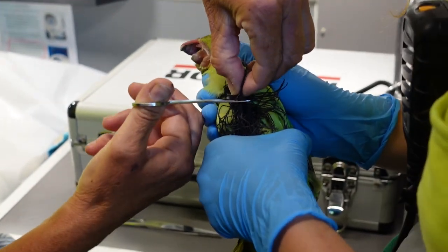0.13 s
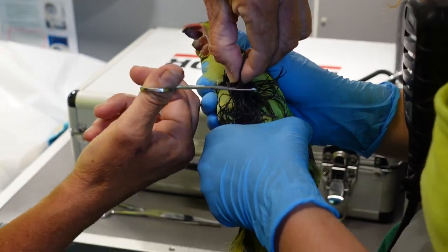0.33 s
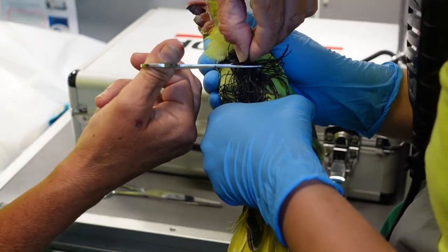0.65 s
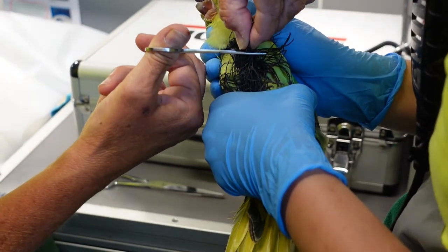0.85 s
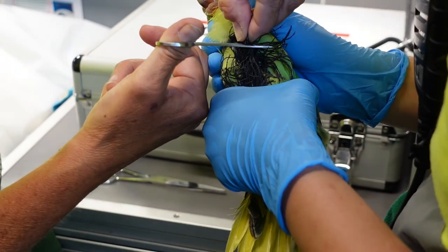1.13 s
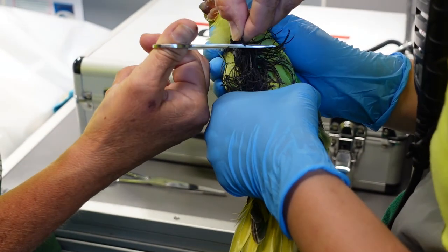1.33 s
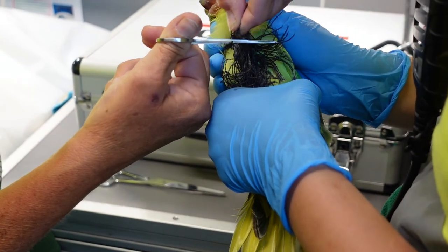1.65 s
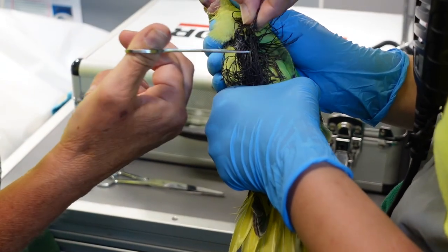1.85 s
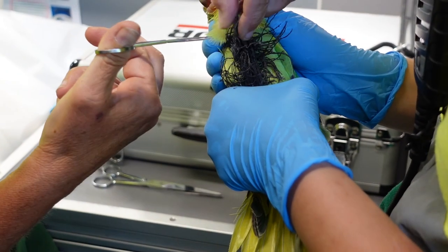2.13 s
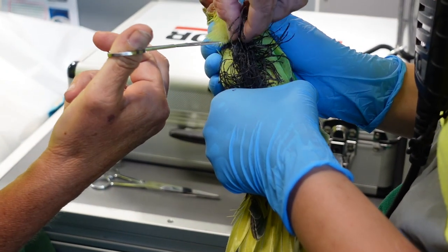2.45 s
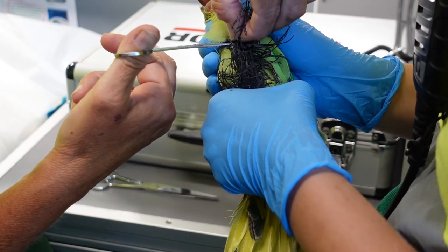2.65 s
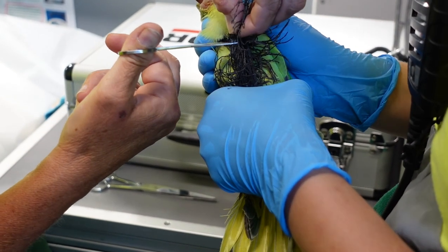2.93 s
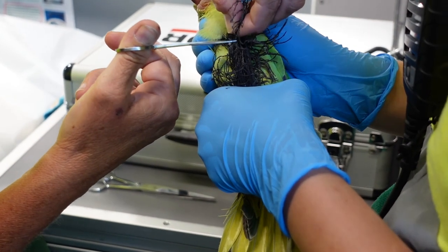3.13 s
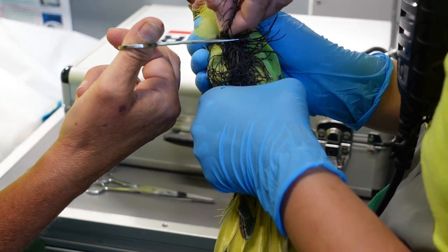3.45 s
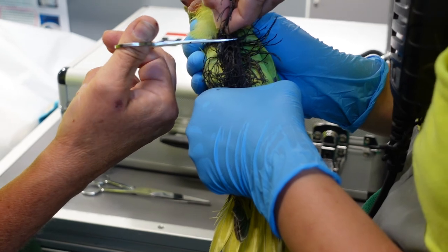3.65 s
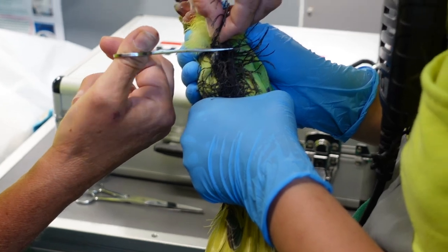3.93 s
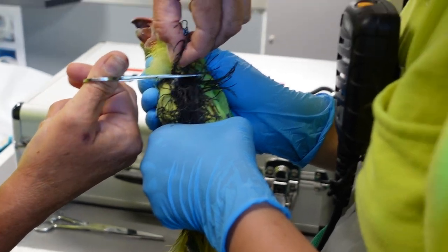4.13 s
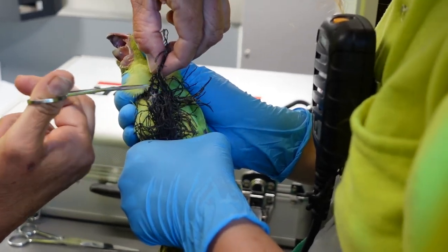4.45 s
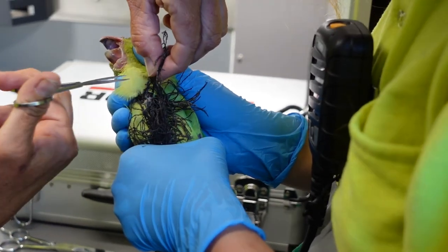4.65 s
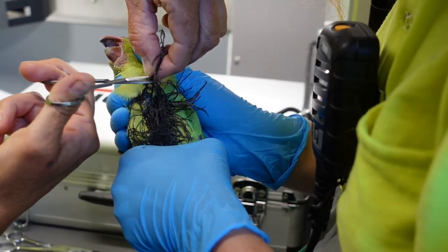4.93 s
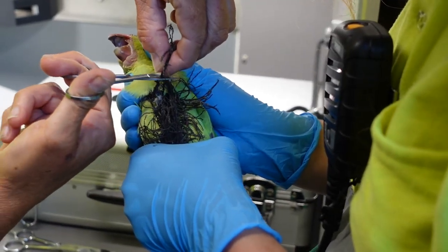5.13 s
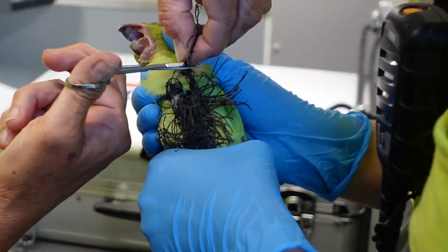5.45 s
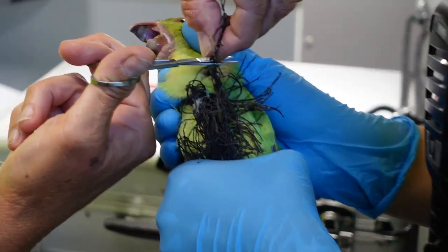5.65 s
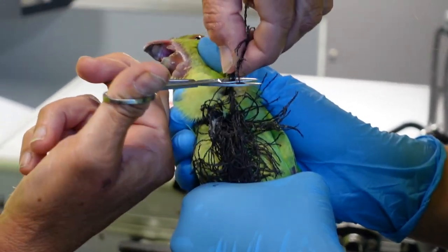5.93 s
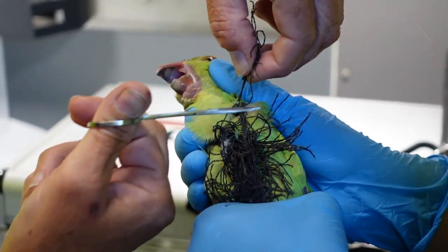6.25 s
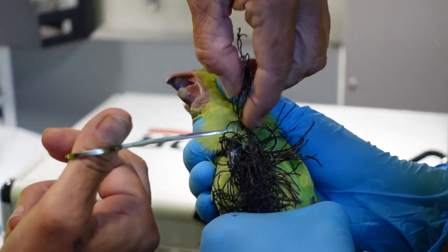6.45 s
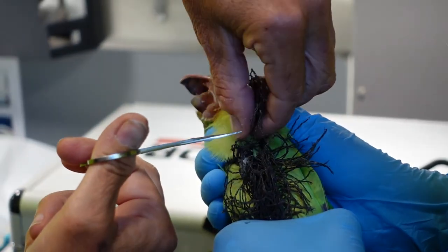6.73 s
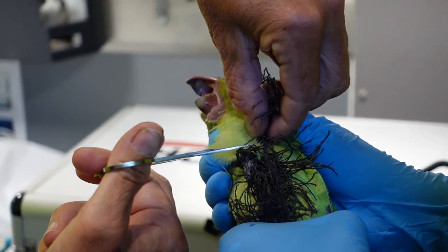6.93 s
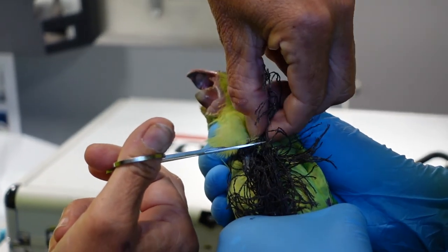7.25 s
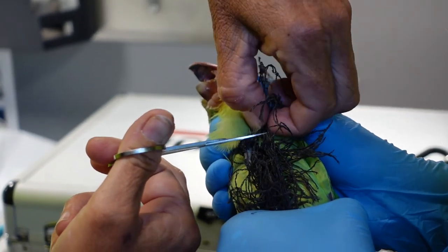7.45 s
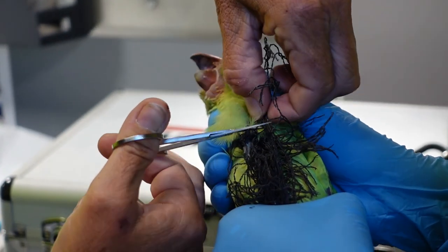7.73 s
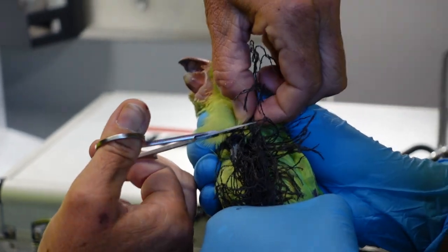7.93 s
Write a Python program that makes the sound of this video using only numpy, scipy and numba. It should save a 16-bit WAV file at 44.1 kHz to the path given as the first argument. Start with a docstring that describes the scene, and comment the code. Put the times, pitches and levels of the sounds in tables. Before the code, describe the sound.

A parakeet screeches over and over in harsh, evenly spaced rasps while scissors snip faintly inside a parked van.

```python
"""Parakeet screeching in a parked van

A hand-held parakeet screeches again and again while scissors snip netting off it. Each screech is a
rattle of about 83 bursts a second; each burst is a few sharp snaps of the syrinx that ring throat and
beak. Once, between screeches, the bird whines thinly. The small cabin rings briefly over a faint rumble."""
import sys
import numpy as np
from scipy import signal
from scipy.fft import rfft, irfft, next_fast_len
from scipy.io import wavfile
from numba import njit

SR = 44100
rng = np.random.default_rng(int(sys.argv[2]) if len(sys.argv) > 2 else 0)


def unload_audio(sound):
    """Save the sound as a 16-bit wav file, at the path given as the first command line argument."""
    columns = np.transpose(np.atleast_2d(sound))
    # keep every value between -1 and 1, then stretch to whole-number steps
    steps = np.round(np.clip(columns, -1, 1) * 32767)
    wavfile.write(sys.argv[1], SR, steps.astype(np.int16))


N = 356769
T = np.arange(N) / SR


def undb(db):
    """Decibels to gain."""
    return 10 ** (np.asarray(db) / 20)


def unit(x):
    """Scale to rms 1."""
    return x / np.sqrt(np.mean(x ** 2) + 1e-18)


def curves(rows):
    """A table's columns, interpolated over the time in its first column."""
    times, *columns = np.transpose(rows)
    return [np.interp(T, times, column) for column in columns]


def add(track, sound, start_s):
    """Mix a sound in; it may start before time zero."""
    i = int(start_s * SR)
    sound, i = sound[max(-i, 0):], max(i, 0)
    track[i:i + len(sound)] += sound[:N - i]


def cut(x, hz, kind, order=2):
    """Butterworth low-pass or high-pass."""
    return signal.sosfilt(signal.butter(order, hz, kind, fs=SR, output="sos"), x)


def band(x, low_hz, high_hz):
    """Gentle band-pass."""
    return cut(cut(x, low_hz, "high"), high_hz, "low")


@njit
def resonator(x, hz, width_hz):
    """State-variable band-pass, gain 1 at its moving centre."""
    y, band_state, low_state = np.empty(len(x)), 0., 0.
    for i in range(len(x)):
        g, damping = np.tan(np.pi * hz[i] / SR), width_hz / hz[i]
        v = (band_state + g * (x[i] - low_state)) / (1 + g * (g + damping))
        band_state = 2 * v - band_state
        low_state += 2 * g * v
        y[i] = damping * v
    return y


def resonate(x, modes, tuning=1):
    """Parallel (Hz, width Hz, dB) resonances, their centres scaled by tuning."""
    tuning = tuning * np.ones(len(x))
    return sum(undb(db) * resonator(x, hz * tuning, float(width)) for hz, width, db in modes)


def shaped_noise(samples, spectrum):
    """Noise of rms 1, minimum-phase filtered through (Hz, dB) points."""
    size = next_fast_len(samples + 4096)
    hz, db = np.transpose(spectrum)
    bin_hz = np.arange(size + 1) * SR / (2 * size)
    gain = undb(np.interp(np.log(bin_hz + 1), np.log(hz), db))
    cepstrum = irfft(np.log(gain))
    cepstrum[1:size] *= 2
    cepstrum[size + 1:] = 0
    white = rfft(rng.standard_normal(samples), 2 * size)
    return unit(irfft(white * np.exp(rfft(cepstrum)))[:samples])


def drift(below_hz):
    """Slow random motion of rms 1."""
    return unit(cut(rng.standard_normal(N), below_hz, "low"))


# Cabin hush. Each row: frequency in Hz, relative density in dB.
HUSH_SPECTRUM = [(25, -34.5), (65, -15), (120, -20), (190, -13), (280, -9.5), (420, -4), (560, -7.5),
                 (1000, -4), (1600, -11), (3300, -15), (6500, -26), (15000, -33)]
# Each row: time in seconds, rumble level in dB, hush level in dB.
BACKGROUND_LEVELS = [(0, -82.5, -66), (2.55, -87, -64), (3.4, -80.5, -62.5), (4.1, -75, -62),
                     (5.8, -83, -63), (7.35, -77.5, -65), (8.05, -66.5, -64.5)]

def background(side_db=-13, waver_db=2):
    """A faint stereo hush and an uneven low rumble in the van."""
    rumble_db, hush_db = curves(BACKGROUND_LEVELS)
    mid, side = (shaped_noise(N, HUSH_SPECTRUM) for _ in range(2))
    hush = mid + undb(side_db) * np.array([side, -side])
    rumble = resonate(rng.standard_normal(N), [(120, 35, 0), (300, 130, -9)])
    rumble = unit(cut(rumble, 400, "low"))
    return undb(hush_db) * hush + undb(rumble_db + waver_db * drift(6)) * rumble


# Each row: frequency in Hz, relative gain in dB.
CABIN_MODES = [(420, -1), (500, 6), (775, -0.5), (904, -0.5), (1141, 4), (1346, 5), (1529, -9.5),
               (1735, -2), (1852, -3.5), (1906, -2.5), (2046, -0.5), (2110, -7.5), (2217, 2), (2326, -5),
               (2408, 0), (2556, 4.5), (2722, -10), (3050, -4.5), (3241, -9.5), (3477, -8), (3992, -1.5),
               (4154, 0.5), (4290, -3.5), (4466, 3.5), (5050, -1.5), (5115, -5), (5733, -2.5), (6005, 5)]
# Each row: delay in seconds, level in dB re the direct sound, left minus right in dB.
WALL_ECHOES = [(.0062, -16, -2), (.0049, -19, 2)]

def cabin(x, direct_db=-7, ring_db=-3, ring_width_hz=30, tail_db=-12, side_db=-15,
          t60_s=.16, treble_t60_s=.13):
    """Direct sound, near echoes, cabin resonances and a short diffuse tail, wider in the treble."""
    t = np.arange(14000) / SR
    impulse = (t == 0) * 1.
    ring = resonate(impulse, [(hz, ring_width_hz, db) for hz, db in CABIN_MODES])
    response = np.tile(undb(direct_db) * impulse + undb(ring_db) * ring, (2, 1))
    for delay_s, db, pan_db in WALL_ECHOES:
        response[:, int(delay_s * SR)] += undb(db + direct_db + np.array([pan_db, -pan_db]) / 2)
    noise = rng.standard_normal((2, len(t)))
    lows = cut(noise, 4700, "low", order=1)
    decay = undb(-60 * t / t60_s)
    tail = lows * decay + 1.375 * (noise - lows) * undb(-60 * t / treble_t60_s)
    mid, side = tail * (t > .003) / np.linalg.norm(decay)
    side = cut(cut(side, 500, "high", order=1), 10000, "low")
    response += undb(tail_db) * mid + undb(side_db) * np.array([side, -side])
    return signal.fftconvolve(x[None], response, axes=1)[:, :N]


# Each row: frequency in Hz, relative density in dB.
CLICK_SPECTRUM = [(300, -24), (1500, -30.5), (3000, -6), (5500, -8), (9000, -1.5), (12000, -17.5),
                  (15000, -10.5)]
KNOCK_SPECTRUM = [(150, -16), (450, 24.5), (900, 10), (2500, 15.5), (5500, 3.5), (9000, -4), (16000, -37)]
# Each row: start in seconds, click level in dB, knock in dB re the click, click T60 in seconds.
SCISSOR_SNIPS = [(1.758, -33.5, -15, .0074), (4.118, -37.5, 10, 0.0043), (4.154, -48, -12, .01),
                 (4.217, -49.5, -11, .03), (4.224, -22.5, -12, .008)]

def scissors(knock_t60_s=.0063):
    """Blades click shut through the threads, sometimes with a dull knock."""
    track, t = np.zeros(N), np.arange(4096) / SR
    for start_s, level_db, knock_db, t60_s in SCISSOR_SNIPS:
        click = shaped_noise(len(t), CLICK_SPECTRUM) * undb(-60 * t / t60_s)
        knock = shaped_noise(len(t), KNOCK_SPECTRUM) * undb(-60 * t / knock_t60_s)
        add(track, undb(level_db) * (click + undb(knock_db) * knock), start_s)
    return track


# Each row: time in seconds, pitch in Hz, tone level in dB, hiss level in dB.
WHINE_CONTOUR = [(5.62, 478, -39, -49), (5.66, 480, -46, -48), (5.73, 481, -45.5, -47),
                 (5.77, 487, -44.5, -50), (5.787, 463, -47, -42.5), (5.8, 450, -62, -64)]
# Each row: harmonic number, relative level in dB.
WHINE_HARMONICS = [(1, -21), (3, -3), (4, 0.5), (5, -1), (7, -0.5), (9, -5), (10, -14), (11, -6.5),
                   (13, -19)]
# Each row: frequency in Hz, width in Hz, relative gain in dB.
WHINE_HISS_MODES = [(400, 210, 1), (2000, 980, -8.5), (3760, 1600, -5)]

def whine(waver=.0056):
    """The bird holds a thin, hissy note that ends in a short rasp."""
    pitch_hz, tone_db, hiss_db = curves(WHINE_CONTOUR)
    phase = 2 * np.pi * np.cumsum(pitch_hz * (1 + waver * drift(52))) / SR
    tone = unit(sum(undb(db) * np.sin(k * phase) for k, db in WHINE_HARMONICS))
    hiss = unit(cut(resonate(rng.standard_normal(N), WHINE_HISS_MODES), 9000, "low"))
    sounding = (T > WHINE_CONTOUR[0][0]) & (T < WHINE_CONTOUR[-1][0])
    return (undb(tone_db) * tone + undb(hiss_db) * hiss) * sounding


def chirps(t, starts_s, detune, top_hz=5600, spread=.1425, fall_s=.002577, length_s=.0045):
    """The membrane slackens through each burst, so its note drops over two octaves in a few ms."""
    burst = np.maximum(np.searchsorted(starts_s, t) - 1, 0)
    age_s = np.clip(t - starts_s[burst], 0, length_s)
    onset_hz = top_hz * np.exp(spread * detune[burst])
    cycles = onset_hz * fall_s * (1 - np.exp(-age_s / fall_s))
    return np.sin(2 * np.pi * cycles) * np.sin(np.pi * age_s / length_s)


# Successive snaps of one burst. Each entry: relative level in dB.
SNAP_LEVELS_DB = [-3, -3.5, -1.5, -4, -4.5, -6.5, -7, -11]

def syrinx(t, length_s, rattle_hz, snap_hz, burst_jitter=.018, gap_jitter=.08,
           puff_s=.0005, puff_db=-6, chirp_db=-13, bursts=56):
    """Bursts of uneven snaps with puffs of air and a chirp. Also returns one plain beat per burst."""
    shift, spacing, accent, detune = rng.standard_normal((bursts, 4)).T
    snap_spacing, snap_accent = rng.standard_normal((bursts, len(SNAP_LEVELS_DB), 2)).transpose(2, 0, 1)
    starts_s = np.interp(np.arange(bursts) + burst_jitter * shift, np.cumsum(rattle_hz) / SR, t)
    gaps_s = np.exp(gap_jitter * (snap_spacing + spacing[:, None]))
    gaps_s /= np.interp(starts_s, t, snap_hz)[:, None]
    times_s = starts_s[:, None] + np.cumsum(gaps_s, axis=1) - gaps_s[:, :1]
    gains = undb(np.array(SNAP_LEVELS_DB) - 1.16 * snap_accent + .5 * accent[:, None])
    sounding = times_s < length_s
    snaps = np.bincount((times_s[sounding] * SR).astype(int), gains[sounding], len(t))
    puff_envelope = signal.lfilter([1], [1, -np.exp(-1 / (puff_s * SR))], snaps)
    puffs = puff_envelope * np.sign(rng.standard_normal(len(t)))
    glides = chirps(t, times_s[:, 1], detune) * (t < length_s)
    beats = np.bincount((starts_s[starts_s < length_s] * SR).astype(int), minlength=len(t))
    return unit(snaps) + undb(puff_db) * unit(puffs) + undb(chirp_db) * unit(glides), unit(beats)


# Each row: mid-screech frequency in Hz, width in Hz, relative gain in dB.
BODY_MODES = [(450, 130, -11), (789, 46, 3.5), (886.4, 77, 2), (1157, 420, -7.5)]

def body(beats, blowing, tuning, flow_db=-3, edge_hz=805):
    """Beats and airflow stir the bird's body, which radiates poorly below edge_hz."""
    flow = undb(flow_db) * rng.standard_normal(len(beats)) * blowing
    drive = cut(beats + flow, edge_hz, "high", order=3)
    return unit(band(resonate(drive, BODY_MODES, tuning), 420, 1900))


# Each row: frequency at rest in Hz, width in Hz, relative gain in dB.
WINDPIPE_MODES = [(2407, 110, 7), (2540, 220, 11)]
THROAT_MODES = [(1773, 57, -5), (2156, 570, 3)]

def windpipe(rattle, hz, throat_db, rest_hz=2480):
    """The rattle rings the windpipe's moving note and the steady throat resonances below it."""
    pipe = unit(resonate(rattle, WINDPIPE_MODES, hz / rest_hz))
    throat = unit(resonate(rattle, THROAT_MODES))
    return unit(band(pipe + undb(throat_db) * throat, 1110, 3440))


# Each row: frequency at rest in Hz, width in Hz, relative gain in dB.
BEAK_MODES = [(3490, 1000, -6), (4050, 280, -7), (4350, 410, 6.5), (5135, 580, 5), (5850, 240, -4)]
BEAK_TREBLE_MODES = [(7450, 600, 3), (8150, 800, 3), (9300, 900, .5), (11500, 5000, -17),
                     (14500, 1200, -11)]

def beak(rattle, hz, treble_db, rest_hz=4287):
    """The rattle rings mouth and beak; main and treble resonances shift together."""
    main = band(resonate(rattle, BEAK_MODES, hz / rest_hz), 3440, 4400)
    treble = band(resonate(rattle, BEAK_TREBLE_MODES, hz / rest_hz), 8600, 10500)
    return unit(main) + undb(treble_db) * unit(treble)


def screech(length_s, level_db, windpipe_db, treble_db, throat_db, beak_hz, beak_sag_hz_per_s,
            windpipe_hz, rattle_hz, snap_hz=868, attack_s=.015, swell_s=.076, release_s=.092,
            spin_up_s=.009, open_s=.069, tire_s=.13, body_sag_per_s=.3, windpipe_sag_per_s=.078):
    """One push of air rattles the syrinx; as it runs out the rattle slows, body and windpipe sink."""
    t = np.arange(28000) / SR
    from_middle_s = t - length_s / 2
    release = np.clip((t - length_s) / release_s + 1, 0, 1)
    tired = np.clip((t - length_s) / tire_s + 1, 0, 1)
    # Shortfall from the full push: it builds up, holds and gives out.
    lack_db = 4.5 * np.exp(-t / attack_s) + 6.5 * np.exp(-t / swell_s) + 26.5 * release ** 3.57
    speed = 1 - .5 * np.exp(-t / spin_up_s)
    opening = 1 - .043 * np.exp(-t / open_s)
    body_sag = 1 - body_sag_per_s * from_middle_s
    pipe_sag = 1 - windpipe_sag_per_s * from_middle_s
    burst_hz = rattle_hz * speed * (1 - .07 * tired)
    rattle, beats = syrinx(t, length_s, burst_hz, snap_hz * speed * body_sag)
    rattle = cut(rattle, 710, "high", order=6)
    pipe = windpipe(rattle, windpipe_hz * opening * pipe_sag, throat_db)
    # A weak push is duller: windpipe and body gain on the beak.
    voice = beak(rattle, beak_hz - beak_sag_hz_per_s * from_middle_s, treble_db - .01 * lack_db)
    voice += undb(windpipe_db + .1768 * lack_db + 3 * tired) * pipe
    voice += undb(-17 + .5973 * lack_db) * body(beats, t < length_s, body_sag)
    return voice * undb(level_db - lack_db) * np.sqrt(length_s / t[-1])


# Each row: start and end in seconds, beak level at full push in dB, windpipe and treble in dB re the
# beak, throat in dB re the windpipe, beak note in Hz, its sag in Hz per second, windpipe note in Hz,
# bursts per second.
SCREECH_CALLS = [ (-.45, 0.073, -15, -6, -8, -8, 4400, 89.5, 2540, 81.5),
                 (0.293, 0.793, -17, -7, -5.5, -7, 4390, 33, 2470, 83.34),
                 (1.034, 1.566, -17, -7, -6, -7.5, 4220, 144, 2460, 82.05),
                 (1.84, 2.375, -16.5, -7.5, -6.5, -8, 4184, 153, 2440, 83),
                 (2.651, 3.156, -16.5, -6, -5.5, -9.5, 4090, -200, 2480, 81.42),
                 (3.437, 3.956, -17, -6, -6.5, -3.5, 4180, -3, 2510, 83.2),
                 (4.273, 4.767, -16.5, -7.5, -6.5, -1.5, 4180, 291, 2490, 84),
                 (5.081, 5.643, -18, -5.5, -5, -3.5, 4135, -150, 2665, 83),
                 (5.885, 6.398, -17, -5, -7, -4, 4260, 781, 2636, 83.25),
                 (6.675, 7.211, -16, -7, -7, -3, 4220, 195, 2510, 86.63),
                 (7.449, 7.963, -16, -6.5, -6, -2.5, 4050, 482, 2524, 84.6), ]

def parakeet(fade_in_s=.004):
    """The run of screeches and the one whine."""
    track = whine()
    for start_s, end_s, *voice in SCREECH_CALLS:
        add(track, screech(end_s - start_s, *voice), start_s)
    return track * np.minimum(T / fade_in_s, 1)


def scene():
    """Bird and scissors close by in the cabin, over hush and rumble."""
    return cabin(parakeet() + scissors()) + background()


def record(dry):
    """Soften the treble above 12 kHz and cut it steeply at 15.8 kHz."""
    soft = cut(dry, 12000, "low")
    return signal.sosfilt(signal.ellip(10, .2, 80, 15800, fs=SR, output="sos"), soft)


dry = scene()
out = record(dry)
unload_audio(out)
```